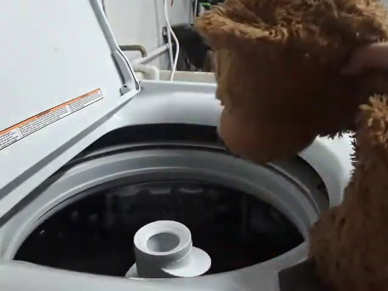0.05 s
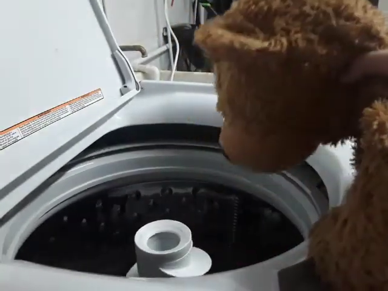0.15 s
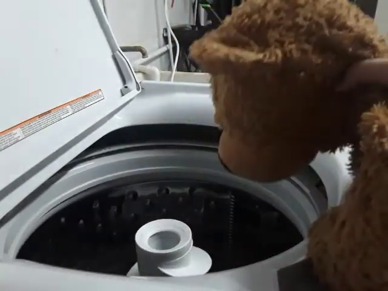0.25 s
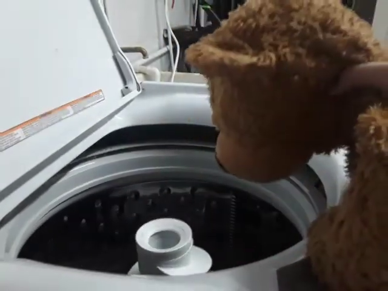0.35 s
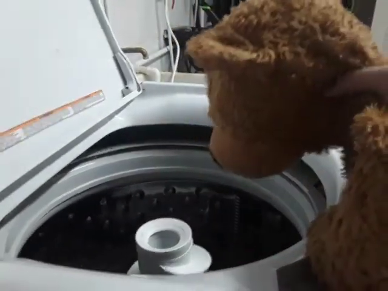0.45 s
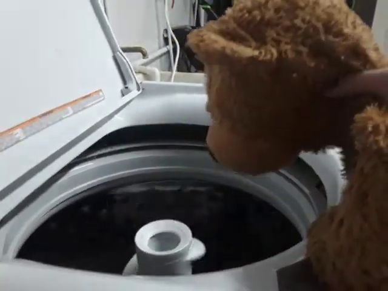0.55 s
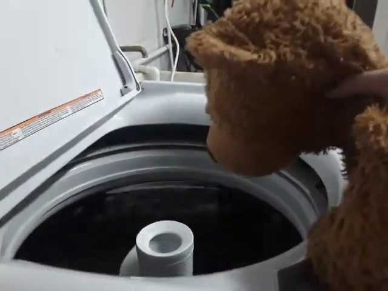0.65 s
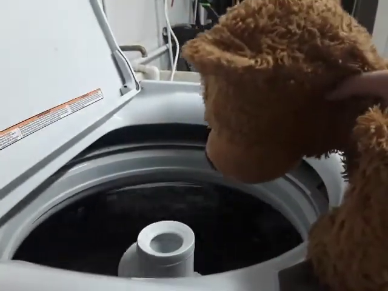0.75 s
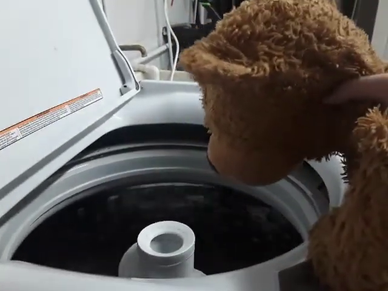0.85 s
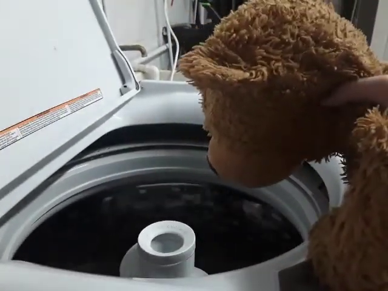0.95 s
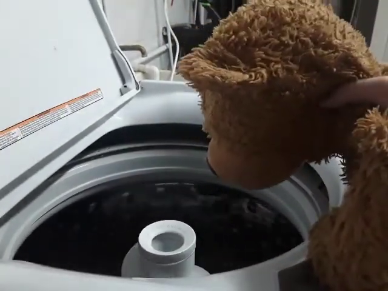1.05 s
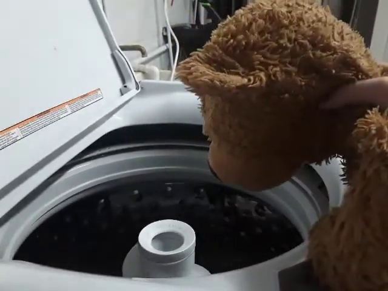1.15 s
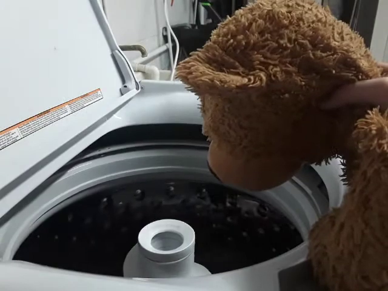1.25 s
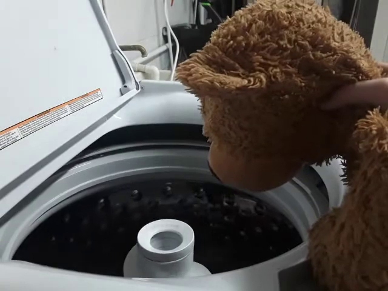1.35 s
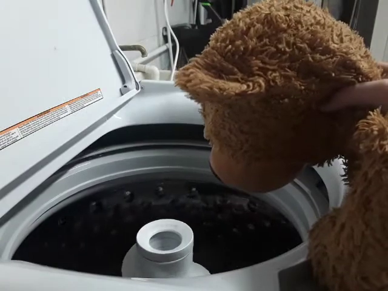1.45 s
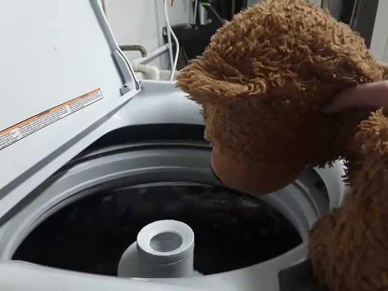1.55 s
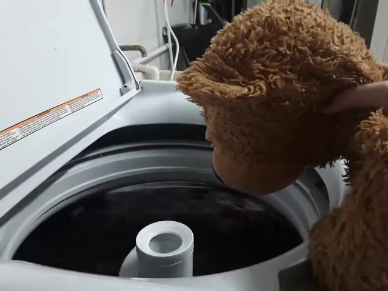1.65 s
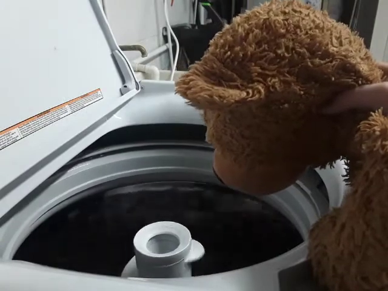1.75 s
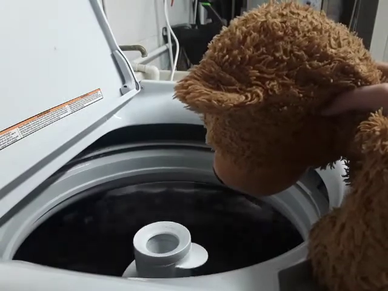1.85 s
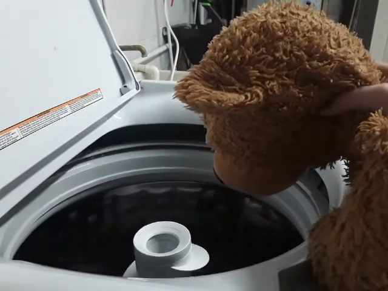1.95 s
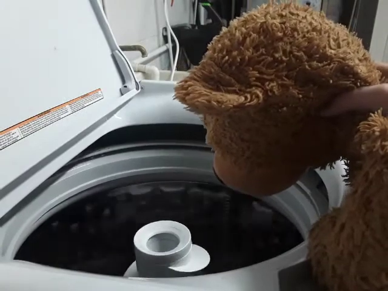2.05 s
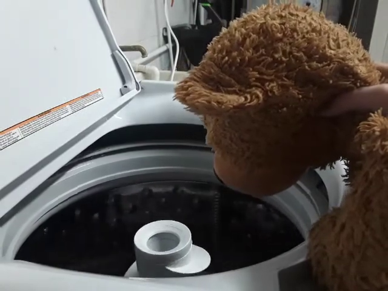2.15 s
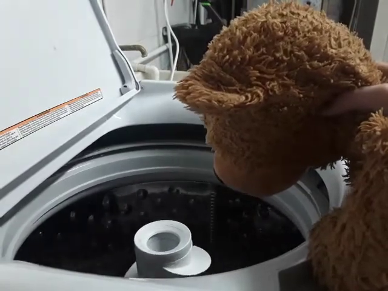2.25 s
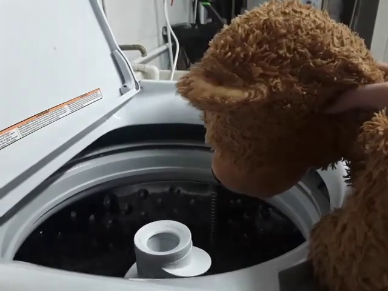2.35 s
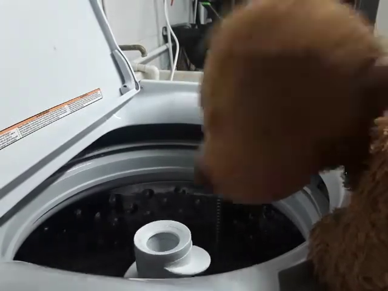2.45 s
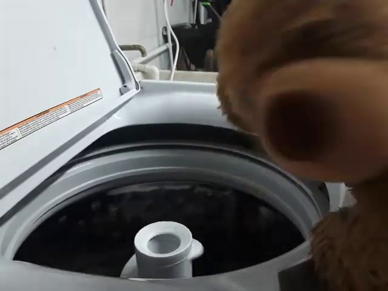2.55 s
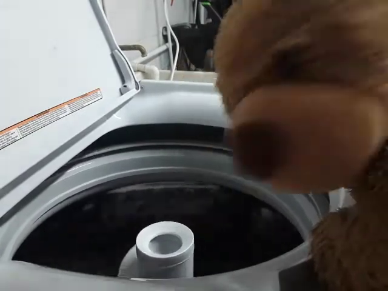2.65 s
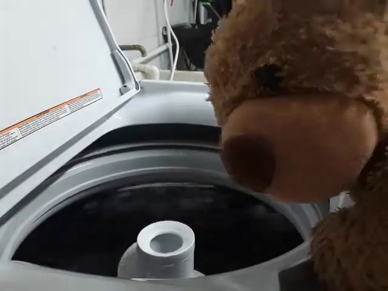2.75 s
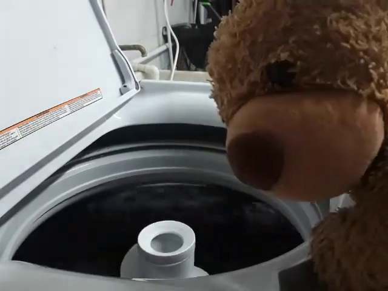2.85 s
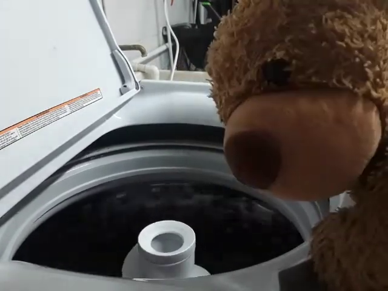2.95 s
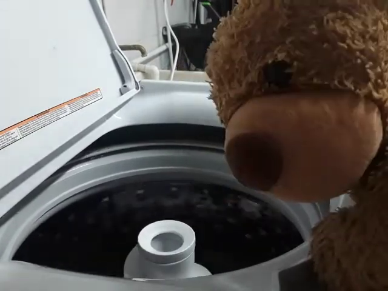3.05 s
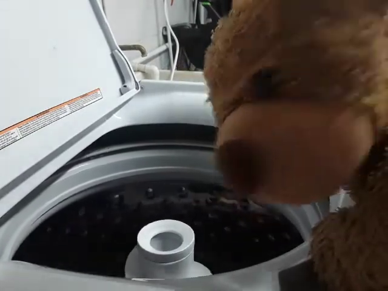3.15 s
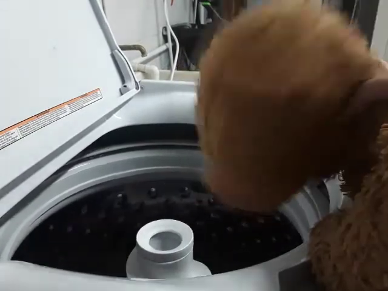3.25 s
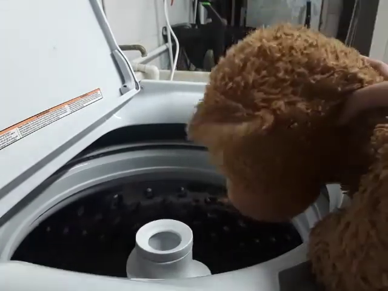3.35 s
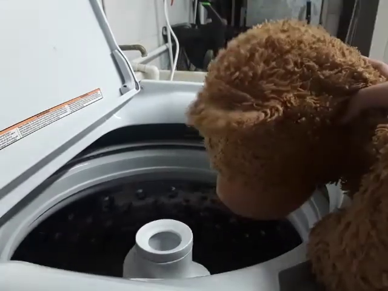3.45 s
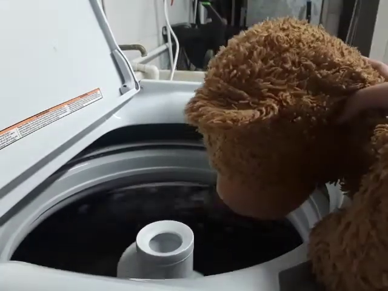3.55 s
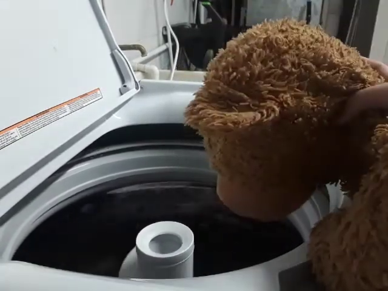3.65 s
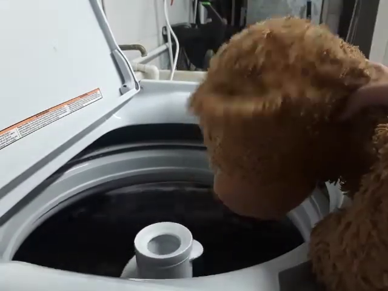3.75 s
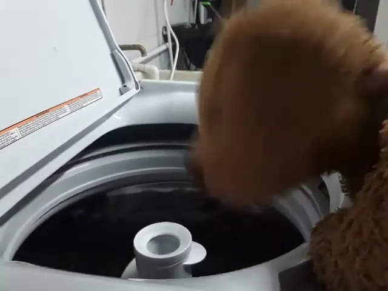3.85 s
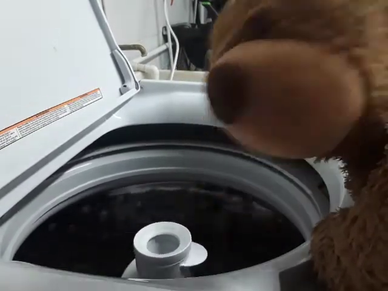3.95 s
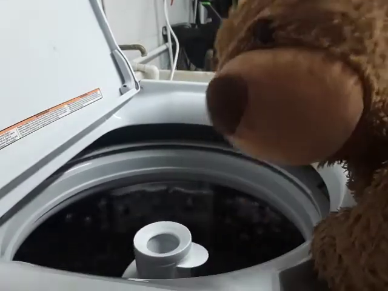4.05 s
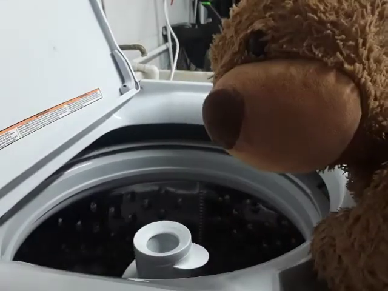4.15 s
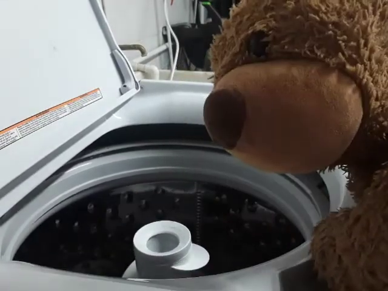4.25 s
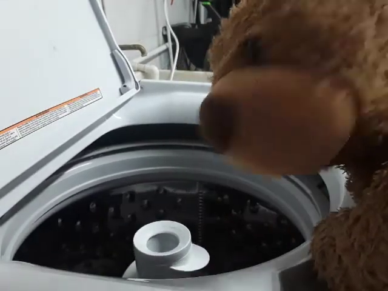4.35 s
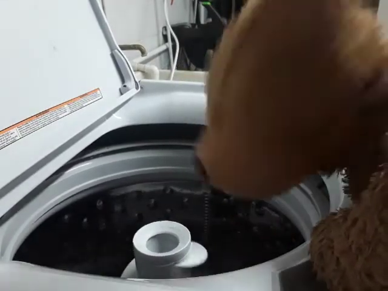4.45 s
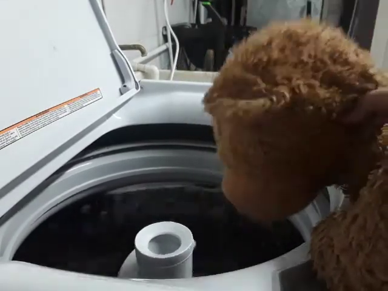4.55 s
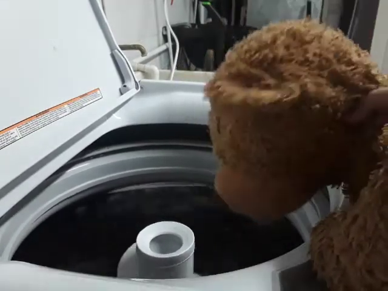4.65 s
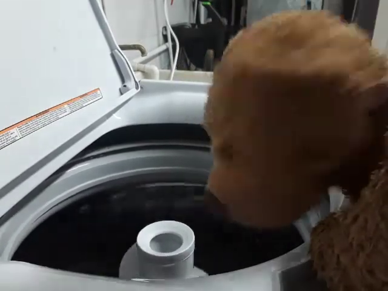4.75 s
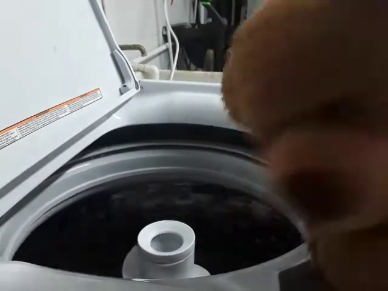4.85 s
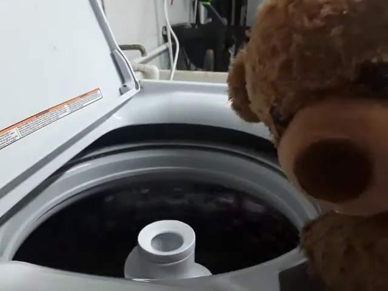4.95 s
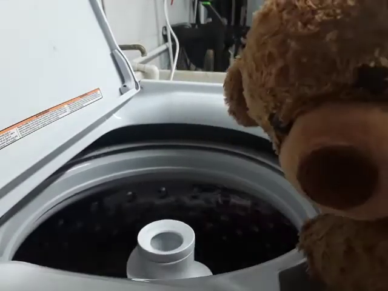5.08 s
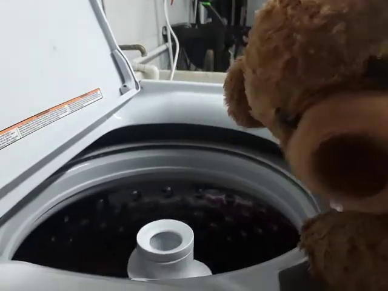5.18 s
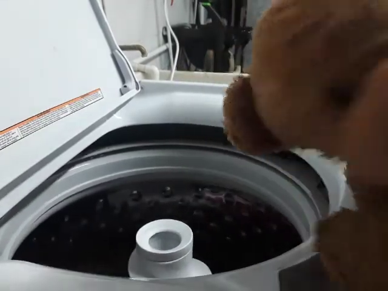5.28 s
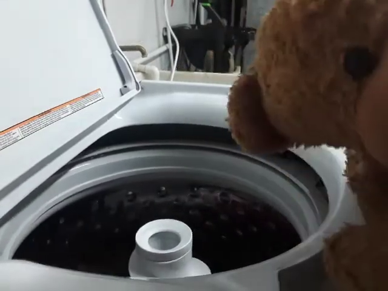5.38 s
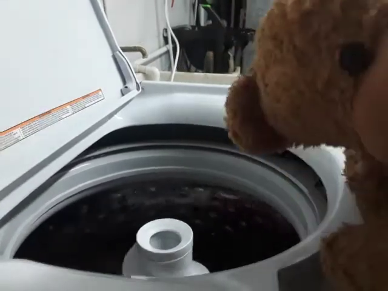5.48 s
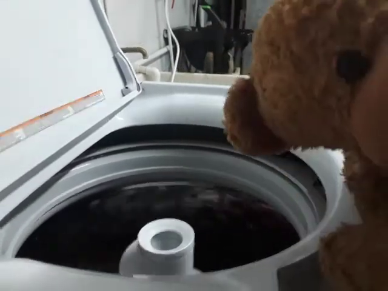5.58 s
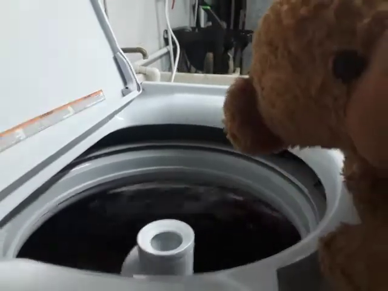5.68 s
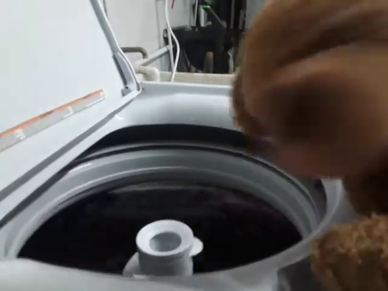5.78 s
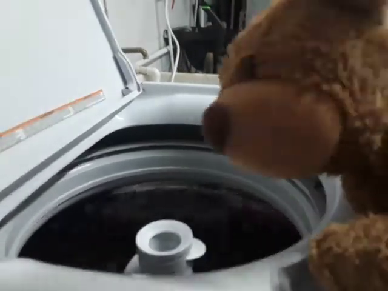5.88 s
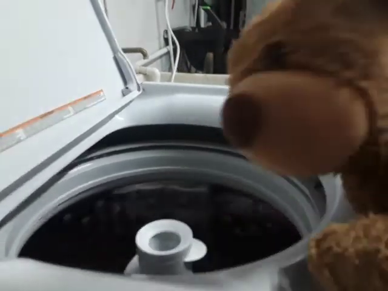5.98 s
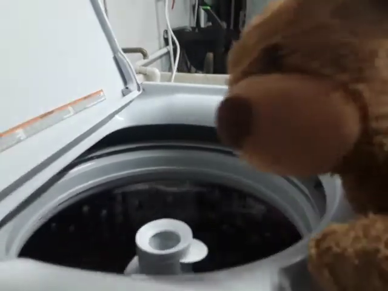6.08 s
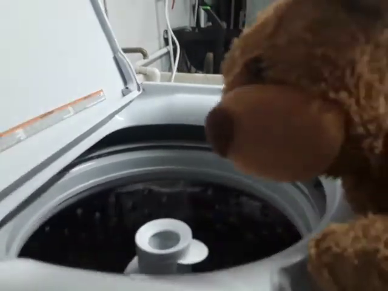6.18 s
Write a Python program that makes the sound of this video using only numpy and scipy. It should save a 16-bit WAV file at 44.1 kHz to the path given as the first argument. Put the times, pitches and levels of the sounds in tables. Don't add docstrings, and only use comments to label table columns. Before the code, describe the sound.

Back-and-forth washing machine strokes, close up: mains hum swells, gears knock and whine, water sloshes and spatters, then a brief quiet lull.

```python
import sys
import numpy as np
from scipy import signal
from scipy.fft import rfft, irfft, next_fast_len
from scipy.io import wavfile
from scipy.ndimage import uniform_filter1d

SR = 44100
rng = np.random.default_rng(int(sys.argv[2]) if len(sys.argv) > 2 else 0)


def voltage_ratio(decibels):
    exponent = np.asarray(decibels, float) / 20
    return 10 ** exponent


def persist_wave(psi):
    counts = np.round(np.clip(psi, -1, 1) * 32767).astype(np.int16)
    wavfile.write(sys.argv[1], SR, np.atleast_2d(counts).T)


N = 274302

# [switch-on t/s, switch-on jolt/dB, motor/dB, water/dB, settling speed (1 = usual)]
STROKES = [
    (-.575, -1, 2.5, 4.5, 1.08),
    (0.426, 6, -1, 0.84, 0.86),
    (1.422, 0.5, 1.4, -0.1, 1.07),
    (2.42, 0.5, -1, 1.54, 0.88),
    (3.427, 1, 0.53, -0.65, 0.99),
    (4.433, 8, -2, 0, 0.93),
    (5.436, 6.5, -0.56, -0.76, 0.89),
]
# [level/dB, starts below by/dB, rise/s, climb/(dB/s), lets go t/s, drop/dB, fade/(dB/s)]
WAVE = [(-46.5, 23.3, 0.089, 8, 0.32, 1.2, 42), (-44.5, 43, 0.046, 11.4, 0.38, 4.3, 69.5)]
# [f/Hz, level/dB per Hz]
GURGLE = [(100, -77), (560, -35.5), (680, -0.5), (900, 5.5), (1200, 1.5), (1500, -10.5), (2400, -34)]
STEADY_DB = 1.6


def evened(x):
    return x / np.sqrt(np.mean(x ** 2) + 1e-20)


def read(points, hz):
    f, value = np.transpose(points)
    return np.interp(np.log(hz + 1), np.log(f + 1), value)


def add(mix, s, sound):
    part = mix[..., round(s * SR):][..., :sound.shape[-1]]
    part += sound[..., :part.shape[-1]]


def flutter(hz, db):
    steps = np.clip(rng.standard_normal(2000), -1.8, 1.8)
    return voltage_ratio(db * np.interp(np.arange(N) * hz / SR, np.arange(2000), steps))


def lagged(gain, s):
    r = np.exp(-1 / (s * SR))
    return signal.lfilter([1 - r], [1, -r], gain)


def noise(spectrum, patchy_db, size):
    frames, hz = 4 * N // size + 5, np.fft.rfftfreq(size, 1 / SR)
    a, b, c, d, patches = rng.standard_normal((frames, len(hz), 5)).T
    patches = uniform_filter1d(patches, size=5, axis=0)
    patches = evened(uniform_filter1d(patches, size=10, axis=1))
    colour = voltage_ratio(read(spectrum, hz)[:, None] + patchy_db * patches)
    z = np.array([a + 1j * b, c + 1j * d]) * colour
    return evened(signal.istft(z, nperseg=size, noverlap=3 * size // 4)[1][:, :N])


def rings(modes, wobble_db):
    out, t = np.zeros((2, N)), np.arange(N) / SR
    for hz, width_hz, db in modes:
        r = np.exp(-np.pi * width_hz / SR)
        slow = rng.standard_normal((2, N)) + 1j * rng.standard_normal((2, N))
        slow = signal.lfilter([1], np.convolve([1, -r], [1, -r]), slow)
        slow /= abs(slow) ** 0.96
        tone = (slow * np.exp(2j * np.pi * hz * t)).real
        out += voltage_ratio(db) * evened(tone) * flutter(14, wobble_db)
    return evened(out)


def gains(parts, wet):
    stall_db = [45, 19.5]
    switch_s, let_go_s, jolt_s = 0.021, 0.067, 0.065
    heave = 0.93 if wet else 1
    follow = 1 if wet else 0.6
    out = np.zeros((len(parts), N))
    for stroke, (start, jolt_db, motor_db, water_db, settle) in enumerate(STROKES):
        first = round(start * SR)
        span = slice(max(first - SR // 8, 0), first + 2 * SR)
        t, way = np.arange(N)[span] / SR - start, 1 - stroke % 2
        since = np.maximum(t, 0)
        push_db = water_db if wet else motor_db + jolt_db * np.exp(-since / jolt_s)
        switch_db = 45 * np.minimum(t, 0) / switch_s
        for k, part in enumerate(parts):
            db, below_db, rise, climb, off, drop_db, fade = part[way]
            u = np.maximum(t - off, 0) * settle ** follow
            level = db + climb * np.minimum(since, off)
            level -= below_db * np.exp(-(since / rise) ** heave)
            level -= drop_db * (1 - np.exp(-u / let_go_s)) + fade * u + stall_db[way] * u ** 2
            out[k, span] += voltage_ratio(np.maximum(level + push_db + switch_db, -200))
    return out


def room():
    # [f/Hz, level/dB per Hz]
    air = [(15, -37.5), (25, -31), (40, -10.5), (64, -8.5), (127, 4), (190, -14), (344, -20), (818, -31.5),
           (1740, -32.5), (2160, -32.5), (5140, -36.5), (6560, -23.5), (7710, -38), (9570, -37),
           (12900, -16.5), (16000, -32.5)]
    return voltage_ratio(-62) * noise(air, 1.8, size=2048)


def squeals():
    # [t/s, length/s, f/Hz, level/dB]
    whistles = [(0.301, 0.11, 1590, -78), (0.294, 0.11, 3210, -75), (1.2, 0.16, 1800, -72),
                (2.147, 0.135, 1140, -70), (2.133, 0.14, 4400, -71.5), (3.045, 0.31, 1784, -72),
                (4.103, 0.2, 1890, -74.5), (5.056, 0.32, 1740, -73)]
    out = np.zeros((2, N))
    for s, length, hz, db in whistles:
        count = round(length * SR)
        whistle = evened(rings([(hz, 330, 0)], 4)[:, :count])
        add(out, s, voltage_ratio(db) * signal.windows.tukey(count, .6) * whistle)
    return out


def crackles():
    # [t/s, peak/dB, centre f/Hz]
    bursts = [(0.602, -34, 13500), (0.7228, -37, 12700), (1.0121, -48, 13100), (1.7109, -37, 11900),
              (1.7559, -26.5, 13300), (1.8028, -24.5, 12700), (2.616, -25.5, 13400), (2.6344, -34, 12600),
              (3.6676, -39, 13200), (3.7579, -36, 13500), (3.7878, -33, 13000), (3.8207, -33.5, 12900),
              (4.5386, -40, 14000), (4.6518, -24.5, 13900), (4.6922, -27.5, 12200), (4.8623, -36, 12900),
              (5.659, -31, 12800), (5.7478, -35.5, 13600), (5.9009, -35, 13600), (5.9504, -33, 12300)]
    level_db, t60 = -11.5, 0.076
    out, t = np.zeros((2, N)), np.arange(SR // 16) / SR
    wide_band = signal.butter(1, [3000, 7400], "band", fs=SR, output="sos")
    for s, db, hz in bursts:
        clump = uniform_filter1d(3.0 * (rng.random(len(t)) < .012), size=12)
        clicks = rng.standard_normal((2, len(t))) * (0.3 + clump * 4)
        edges_hz = [hz * 0.94, min(hz * 0.99, 17000)]
        high = signal.sosfilt(signal.butter(2, edges_hz, "band", fs=SR, output="sos"), clicks)
        wide = signal.sosfilt(wide_band, clicks)
        fall = voltage_ratio(db + level_db - 60 * t / t60) * (1 - np.exp(-t / .003))
        add(out, s - .002, fall * (evened(high) + 0.46 * evened(wide)))
    return out


def drips():
    # [t/s, peak/dB, f/Hz, t60/s]
    bubbles = [(0.7751, -21.5, 1332, 0.1), (1.1423, -38, 1805, 0.066), (1.8931, -28, 2570, 0.14),
               (2.1216, -47, 1345, 0.07), (2.2323, -51, 2500, 0.11), (3.1812, -45, 1800, 0.08),
               (3.3019, -84, 1740, 0.091), (4.1719, -66, 2000, 0.08), (5.2894, -76.5, 1820, 0.08),
               (6.016, -31.5, 2600, 0.053), (6.06, -44, 1304, 0.2), (1.5269, -31, 3780, 0.11),
               (2.6713, -23.5, 3960, 0.067), (5.874, -28, 3300, 0.048), (5.9234, -33, 3530, 0.05),
               (0.644, -23, 6760, 0.047), (0.723, -29, 6200, 0.065), (1.59, -26.5, 6630, 0.062),
             (1.7335, -21.5, 2620, 0.076), (1.753, -18, 3570, 0.042), (1.753, -21, 4700, 0.07),
             (1.767, -31.5, 4800, 0.045), (1.788, -35, 4620, .03), (1.796, -28, 3470, .04),
             (1.903, -30, 4740, .05), (2.625, -25, 6500, 0.055), (2.655, -26, 6400, 0.065),
             (2.72, -19, 2250, .04), (2.764, -30, 3360, 0.056), (2.81, -32, 3500, .05),
             (0.775, -27, 1500, 0.065), (3.544, -36, 2540, 0.059), (3.563, -27, 2486, 0.094),
             (4.609, -28, 6330, 0.08), (4.63, -23, 2370, 0.09), (4.717, -28.5, 6760, 0.059),
             (4.78, -29, 2300, 0.071), (5.566, -28, 2540, .06), (5.7, -30, 2400, .07),
             (1.4287, -49, 6640, .06), (1.531, -24.5, 2440, 0.13), (1.679, -31, 2380, .1),
             (3.4366, -52, 6770, 0.11), (5.4425, -49, 6420, 0.094)]
    out, t = np.zeros((2, N)), np.arange(SR // 5) / SR
    for s, db, hz, t60 in bubbles:
        side = rng.uniform(0.25, 1.3)
        turn = 2 * np.pi * hz * t * (1 + 0.25 * t)
        cluster = np.sin(turn) + .6 * np.sin(1.03 * turn + 1) + .5 * np.sin(.96 * turn + 2)
        fall = voltage_ratio(db - 11.0 - 60 * t / t60) * (1 - np.exp(-t / 0.0027))
        add(out, s, fall * cluster * [[np.sin(side)], [np.cos(side)]])
    return out


def unbroken():
    # [break t/s, held back before/dB]
    breaks = [
        (0.485, 11),
        (2.483, 9),
        (4.468, 21),
    ]
    until = np.array(breaks)[:, :1] - np.arange(N) / SR
    held = np.clip(until / 0.0025, 0, 1) * np.clip((.075 - until) / 0.012, 0, 1)
    return voltage_ratio(-(held * np.array(breaks)[:, 1:]).sum(0))


def patter(swell):
    out, t = np.zeros((2, N)), np.arange(SR // 40) / SR
    for hz in np.geomspace(2300, 6800, num=12):
        size = voltage_ratio(4.3 * np.minimum(rng.exponential(1, (2, N)), 4))
        size = size * (rng.random((2, N)) < 9 / SR)
        bead = np.sin(2 * np.pi * hz * t * (1 + 3.2 * t))
        bead = bead * np.exp(-t / 0.0062) * (1 - np.exp(-t / 0.0011))
        out += signal.oaconvolve(size, bead[None], axes=1)[:, :N]
    return swell * evened(out)


def slaps(low, mid, high):
    # [t/s, peak/dB, bright part/dB, centre f/Hz, t60/s]
    wall = [(0.006, -27.5, -1, 5930, 0.3), (1.902, -31.5, -17, 4500, 0.11), (0.486, -36, -10.5, 1680, 0.24),
            (0.64, -25.5, -4, 2300, 0.57), (0.7247, -31, -12, 2270, 0.11), (0.7991, -27.5, -24, 1600, 0.5),
            (1.013, -31, -14, 2860, 0.28), (1.53, -31.5, -34, 2720, 0.99), (1.751, -21, -4, 4600, 0.2),
            (1.798, -21.5, -1.5, 7000, 0.32), (2.147, -45, 0, 2630, 0.3), (2.485, -26.5, -21, 6460, 0.23),
            (2.608, -27, 2, 6600, 0.91), (2.802, -23, -25, 3340, 0.25), (2.978, -26, -21, 1700, 0.16),
            (3.6973, -20.5, -14.5, 1850, 0.2), (3.7979, -20.5, -19, 3540, 0.21),
            (4.469, -42.5, -24, 6540, 0.67), (4.6506, -22, -2, 2490, 0.099), (4.689, -18, -3.5, 1400, 0.14),
            (4.8604, -22, -5.5, 6600, 0.3), (5.554, -47.5, -22, 1630, 0.081),
            (5.6594, -49, -10, 2430, 0.12), (5.757, -20, -7.5, 6100, 0.14),
            (0.14, -44, -30, 1970, 0.33), (1.152, -39, -28, 1840, 0.37), (3.155, -58, -30, 1770, 0.17),
            (4.948, -33, -23, 1800, 0.21), (1.645, -26.5, -12.5, 2670, 0.31), (5.867, -39, -20, 3300, 0.11)]
    # [t/s, peak/dB, bright part/dB, centre f/Hz, t60/s]
    spits = [(0.615, -27, 5.5, 6852, 0.082), (1.72, -34, 4.5, 6000, .05), (2.655, -27, 1, 6300, .06),
             (3.69, -37, 4, 5500, .08), (3.758, -26.5, 2.5, 6500, .05), (3.786, -33, 5.5, 6500, 0.056),
             (3.818, -35, 5, 6500, 0.056), (4.54, -31.5, 2.5, 6500, 0.055), (5.7, -25.5, -0.5, 6000, 0.065),
             (5.8, -41, 1, 5960, 0.054), (0.908, -35, -10, 4600, .05), (1.11, -42.5, -6, 6900, 0.079),
             (2.765, -27.5, -8, 5500, 0.086), (3.013, -36, -10, 5800, 0.14), (0.795, -33, -10, 3800, .06)]
    out, t = np.zeros((2, N)), np.arange(SR // 4) / SR
    rolled = [np.roll(v, 7777, axis=1) for v in (low, mid, high)]
    for s, db, bright_db, hz, t60 in wall + spits:
        fall = voltage_ratio(db - 18.0 - 60 * t / t60) * (1 - np.exp(-t / 0.0021))
        fall = fall * (0.85 + 0.3 * np.exp(-t / 0.01))
        band = signal.butter(1, [hz * 0.94, hz * 1.044], "band", fs=SR, output="sos")
        pocket = evened(signal.sosfilt(band, rng.standard_normal((2, len(t)))))
        thump, splat, hiss = [v[:, round(s * SR):][:, :len(t)] for v in rolled]
        burst = pocket + 0.96 * thump + 0.9 * min(hz / 4500, 1) * splat
        burst = burst + voltage_ratio(bright_db + 3.5 - 140 * t) * hiss
        add(out, s - .002, fall * burst)
    return out


def water():
    splash = [(-44.5, 25.6, 0.098, 0.1, 0.32, 1.7, 44.5), (-49.5, 30.4, 0.054, 18.2, 0.38, 5, 55)]
    foam = [(-43.5, 35, 0.075, -4.5, 0.3, 3.8, 33), (-47, 26, 0.067, 10, 0.4, 4.8, 61)]
    # [f/Hz, level/dB per Hz]
    slosh_spectrum = [(100, -70.5), (650, -28), (1100, -18), (1350, -3), (1700, -0.5), (2100, -1.5),
                      (2500, -1.5), (3000, -6), (3500, -26.5)]
    spray_spectrum = [(2500, -29.5), (3000, -0.5), (3600, 2), (5200, -3), (6670, 1.5), (7290, -3.5),
                      (7700, -30), (8400, -44)]
    fizz_spectrum = [(7000, -40), (7900, -16.5), (9630, -17), (11800, -5.5), (13100, -5), (15200, -13),
                     (16000, -12.5)]
    slosh, spray, fizz = gains([WAVE, splash, foam], True) * unbroken() ** np.array([[.6], [1], [.3]])
    drops = rng.exponential(0.09, N) * (rng.random(N) < 25 / SR)
    landing = signal.lfilter([1], [1, -np.exp(-1 / (0.0057 * SR))], drops)
    gust = flutter(45, 2.4) * flutter(300, 0.3) * (1 + landing)
    low = noise(slosh_spectrum, 1.57, size=512)
    mid = noise(spray_spectrum, 1.64, size=256)
    high = noise(fizz_spectrum, 0.75, size=256)
    low_slap = low + 0.55 * noise(GURGLE, 4.9, size=512)
    surface = voltage_ratio(-3.0) * gust * (slosh * low + spray * mid + fizz * high)
    return surface + voltage_ratio(-12.5) * patter(spray) + slaps(low_slap, mid, high)


def deep_water():
    glug = [(-48, 14, 0.0084, 19, 0.34, 3.2, 55), (-43, 6.9, 0.093, 13.3, 0.39, 6.7, 94)]
    return voltage_ratio(-3.5) * gains([glug], True)[0] * noise(GURGLE, 2.9, size=512)


def knocks():
    # [t/s, peak/dB, f/Hz, t60/s]
    basket = [(0.494, -18, 318, 0.094), (1.44, -28.5, 303.6, 0.3), (0.764, -20.5, 331.6, 0.26),
              (1.578, -23, 193, 0.21), (1.769, -19.5, 385, 0.09), (2.489, -16.5, 384, 0.07),
              (2.773, -17.5, 332, 0.13), (3.505, -23.5, 345, 0.13), (3.745, -19, 490, 0.11),
              (3.775, -19, 391, 0.12), (4.635, -41, 340, 0.097), (4.757, -26, 340.6, 0.25),
              (5.512, -20.5, 360, 0.094), (5.748, -19, 494, 0.12), (5.778, -19.5, 388, 0.16),
              (1.75, -22, 479, 0.13), (1.79, -24.5, 390, 0.13), (1.8, -34.5, 600, 0.31),
              (3.8, -33, 600, 0.28), (4.755, -24, 344, 0.14), (2.53, -28, 185, .15),
              (2.69, -27.5, 235, .15), (3.68, -26, 235, 0.24), (3.76, -28, 180, .15),
              (5.95, -34, 175, 0.27), (4.93, -34, 335, 0.21), (0.7, -30, 235, .2), (0.99, -34, 335, .2),
              (5.451, -25.5, 310, 0.14)]
    # [t/s, peak/dB, f/Hz, t60/s]
    clanks = [(.495, -31, 1020, 0.11), (.64, -29.5, 885, 0.11), (.79, -29.5, 900, 0.13),
              (1.59, -31, 900, .1), (1.655, -26, 883, 0.11), (4.625, -27, 892, 0.12),
              (4.63, -27, 1112, 0.13), (4.7, -33, 1000, .15), (4.76, -40, 1120, 0.077),
              (5.555, -28, 891, .12), (5.695, -24, 890, 0.11), (5.75, -30, 903, .15),
              (5.755, -29, 1000, 0.13), (5.75, -27, 1110, .15), (1.5, -29.5, 1040, 0.17),
              (2.635, -30, 890, 0.18), (2.64, -32, 1110, 0.13), (3.54, -29.5, 910, .12),
              (3.75, -27, 895, 0.13), (2.97, -38, 1180, .1), (3.8, -34, 1295, 0.14), (4.68, -29, 1306, .1)]
    out, t = np.zeros(N), np.arange(SR // 2) / SR
    for s, db, hz, t60 in basket + clanks:
        sag = 0.4 if 380 < hz < 600 else 0.07
        pitch = hz * (1 + sag * (hz < 600) * (np.exp(-t / 0.04) - 0.55))
        turn = 2 * np.pi * np.cumsum(pitch) / SR
        fall = voltage_ratio(db - 1.5 - 60 * t / t60) * (1 - np.exp(-t / 0.0098)) ** 1.5
        add(out, s - .008, fall * np.sin(turn))
    return signal.sosfilt(signal.butter(2, 90, "high", fs=SR, output="sos"), out) * [[1], [.45]]


def idle():
    off_s = 0.92
    since = np.arange(N) / SR - np.array(STROKES)[:, :1]
    on = np.clip(np.minimum(since, off_s - since) / 0.043, 0, 1).sum(0)
    return voltage_ratio(-60.5) * on * flutter(15, 1.8)


def live():
    cut_s = [0.325, 0.315]
    starts, t = np.array(STROKES)[:, 0], np.arange(N) / SR
    stroke = np.searchsorted(starts, t) - 1
    past = t - starts[stroke] - np.array(cut_s)[1 - stroke % 2]
    return np.exp(-np.maximum(past, 0) / 0.017)


def throb():
    # [first crest t/s, turns/s, depth 0-1]
    wobbles = [(0.586, 14.7, 0.43), (1.536, 15, 0.48), (2.576, 17, 0.37), (3.563, 14.5, 0.77),
               (4.572, 13.8, 0.36), (5.572, 15.1, 0.56)]
    out = np.ones(N)
    for s, rate, depth in wobbles:
        turns = np.arange(-.75, 3.75, rate / SR)
        add(out, s + turns[0] / rate, np.clip(depth, 0, 1) * np.cos(2 * np.pi * turns))
    return out


def rotor(at_speed):
    # [f/Hz, forth/dB, back/dB]
    orders = [(176.7, -48.5, -53), (193, -50.5, -56.5), (232.4, -55, -45), (286.6, -54.5, -50),
              (322, -50, -64), (387, -66, -56.5), (442, -63, -63.5), (565, -59, -62), (695, -66, -62),
              (718, -65, -59), (781, -56.5, -56.5), (994, -57.5, -60), (1110, -59, -54), (1146, -59, -51.5)]
    t, out = np.arange(N) / SR, np.zeros(N)
    forth = np.searchsorted(np.array(STROKES)[:, 0], t) % 2 == 0
    for hz, forth_db, back_db in orders:
        level = np.sqrt(2) * voltage_ratio(np.where(forth, forth_db, back_db)) * flutter(16, 5.3)
        out += level * np.cos(2 * np.pi * hz * t + np.log(flutter(14, 2.0)))
    return at_speed * out


def windings(hum, drive):
    # [multiple of hum, level/dB]
    overtones = [(2, -12), (3, -7.5), (4, 1), (5, -13)]
    hum_hz = 119.87
    turn = 2 * np.pi * hum_hz * np.arange(N) / SR + np.log(flutter(16, 3.05))
    buzz = np.zeros(N)
    for k, db in overtones:
        buzz += voltage_ratio(db) * np.cos(k * turn + 6 * rng.random()) * flutter(20, 2.2)
    tone = np.sqrt(2) * hum * np.cos(turn) * flutter(25, STEADY_DB)
    return tone + voltage_ratio(-1.04) * drive * buzz * live()


def cabinet(tub, panel, powered, load, sway):
    # [f/Hz, width/Hz, level/dB]
    tub_modes = [(175.3, 64, 4), (232, 14, -1.5), (293, 15.2, 1.5), (330.4, 44.8, 3), (385, 81, -1)]
    panel_modes = [(463.5, 12.2, 0.5), (517, 48, -2.5), (563.7, 30, -3.5), (600, 18, -3.5)]
    sway_modes = [(324.3, 35, 0), (364, 30, -2)]
    # [f/Hz, level/dB per Hz]
    rattle = [(25, -57.5), (45, -37.5), (75, -24.5), (110, -3.5), (200, 20.5), (500, 25.5), (660, -22)]
    body = tub * rings(tub_modes, 3.17 * STEADY_DB) * flutter(22, 1.6)
    body = body + voltage_ratio(-1.0) * panel * load * (0.7 - 0.21 * powered) * rings(panel_modes, 0.64)
    body = body + voltage_ratio(-12.0) * tub * noise(rattle, 2.1, size=1024)
    return body + sway * rings(sway_modes, 4.3)


def whine(at_speed, load, gears, wave):
    # [f/Hz, width/Hz, level/dB]
    gear_modes = [(699, 50, -7), (742, 25, -26), (892, 26, -4.5), (921, 17, -7.5), (1020, 14, -8.5),
                  (1098, 26, -7.5), (1155, 19.4, -1.5), (1174, 18, -6)]
    basket_modes = [(1600, 20, 3), (1862, 20, -5.5), (2010, 9.6, -3), (2300, 52, 1.5), (2430, 58, 4)]
    ringing = gears * rings(gear_modes, STEADY_DB) + voltage_ratio(-1.0) * wave * rings(basket_modes, 0.72)
    return at_speed * load ** 0.76 * ringing


def mesh(at_speed, load, gears):
    tone = np.cos(2 * np.pi * 1173 * np.arange(N) / SR + np.log(flutter(18, 4.5))) * flutter(20, 1.6)
    return voltage_ratio(-2.5) * at_speed * np.sqrt(load) * gears * tone


def motor():
    hum_answer = [(-28, 36.5, 0.078, -17, 0.321, 27, 303.5), (-34.5, 47, 0.035, -18, 0.345, 40, 278.5)]
    coast_answer = [(-39.5, 75, 0.14, 0.11, 0.45, 1.3, 153), (-49, 55, 0.049, 0.1, 0.478, 5.9, 61)]
    tub_answer = [(-43, 4, 0.03, 20.6, 0.35, 4.4, 44.6), (-40, 5.8, 0.024, 9.6, 0.36, 1.3, 69)]
    panel_answer = [(-37.5, 2.2, 0.02, 5.8, 0.31, 6, 39.3), (-36.5, 4.6, 0.054, 10, 0.34, 7.4, 87)]
    gear_answer = [(-51, 4, 0.023, 38, 0.28, 2.24, 39.3), (-42.5, 6.6, 0.039, 16.3, 0.36, 7, 80)]
    sway_answer = [(-45.5, 8.7, 0.18, 0.1, 0.54, 1.3, 74), (-63.5, 12, 0.099, 0.1, 0.21, 2.3, 45)]
    answers = [hum_answer, coast_answer, tub_answer, panel_answer, gear_answer, WAVE, sway_answer]
    hum, coast, tub, panel, gears, wave, sway = gains(answers, False)
    hum = lagged(hum - coast + idle(), 0.0035)
    tub, panel, gears = lagged(tub, 0.0089), lagged(panel, 0.0031), lagged(gears, 0.0061)
    powered = np.clip(panel / voltage_ratio(-37.0), 0, 1)
    at_speed = powered * np.clip(hum / voltage_ratio(-37.0), 0, 1) ** 0.58
    at_speed, load = lagged(at_speed, 0.027), throb()
    lines = windings(hum, panel * powered * load) + mesh(at_speed, load, gears) + rotor(at_speed)
    body = cabinet(tub, panel, powered, load, sway) + whine(at_speed, load, gears, wave)
    mix = lines * [[1], [.2]] + body + deep_water()
    return signal.sosfilt(signal.butter(4, 62, "high", fs=SR, output="sos"), mix)


def ports(pair):
    # [f/Hz, likeness 0-1]
    likeness = [(60, 0.98), (130, 0.94), (290, 0.92), (640, 0.89), (1410, 0.23), (3100, 0.0089),
                (6820, 0.0), (15000, 0.079)]
    # [f/Hz, left-right/dB]
    balance = [(60, -1), (110, -2.5), (200, 0.5), (380, -4.5), (700, -2.5), (1290, 1), (2380, 1.5),
               (4400, -1), (8120, 4.5), (15000, -2.5)]
    # [f/Hz, phase/rad]
    phase = [(100, 0.15), (300, 0.053), (600, 1), (1200, 0.086), (2400, 1)]
    size = next_fast_len(N)
    hz, (a, b) = np.fft.rfftfreq(size, 1 / SR), rfft(pair, size)
    same, lead = np.clip(read(likeness, hz), 0, 1), read(phase, hz)
    right = (same * a + np.sqrt(1 - same ** 2) * b) * np.exp(-1j * lead)
    tilt = voltage_ratio(read(balance, hz) / 2)
    lift = 2 / np.sqrt(2 + 2 * np.maximum(same * np.cos(lead), 0))
    return irfft(np.array([a * tilt, right / tilt]) * lift, size)[:, :N]


def scene():
    return ports(room() + squeals() + crackles() + drips() + water() + knocks() + motor())


def roll_off(x):
    return signal.sosfilt(signal.butter(12, 15875, fs=SR, output="sos"), x)


def record(dry):
    # [f/Hz, gain/dB]
    response = [(0, 0), (7300, 0), (7650, -6), (8300, -4), (9200, 0), (15780, 0), (15880, -70),
                (22050, -70)]
    hz, db = np.transpose(response)
    taps = signal.firwin2(1023, hz, voltage_ratio(db), fs=SR)
    mix = signal.oaconvolve(dry, taps[None], "same")
    return roll_off(mix)


dry = scene()
out = record(dry)
persist_wave(out)
```